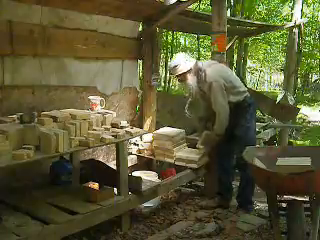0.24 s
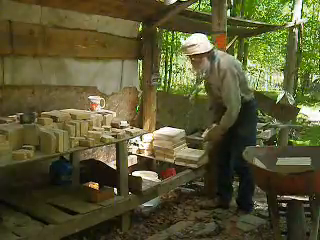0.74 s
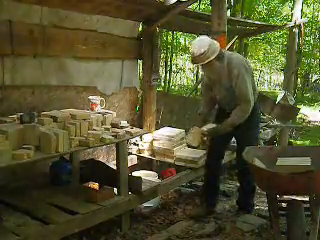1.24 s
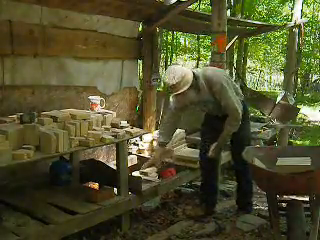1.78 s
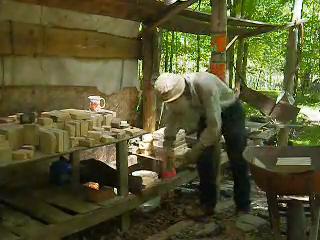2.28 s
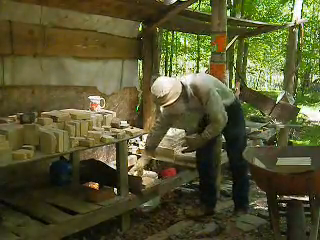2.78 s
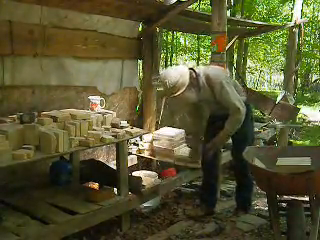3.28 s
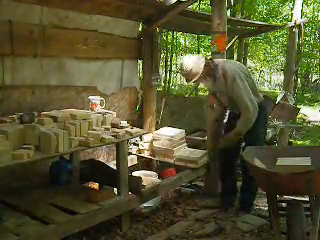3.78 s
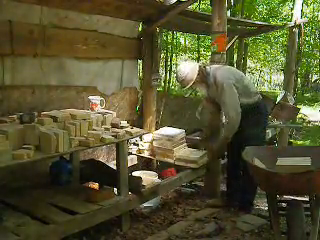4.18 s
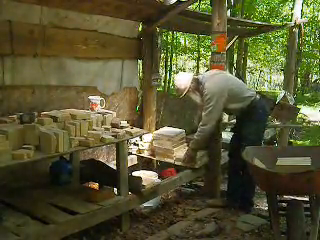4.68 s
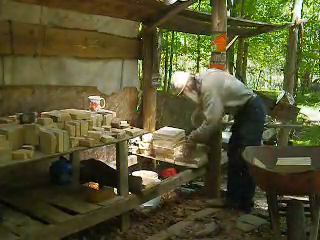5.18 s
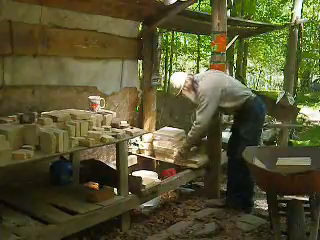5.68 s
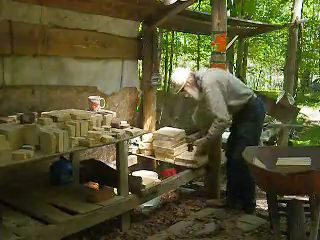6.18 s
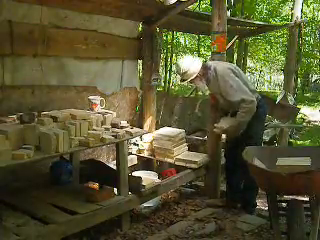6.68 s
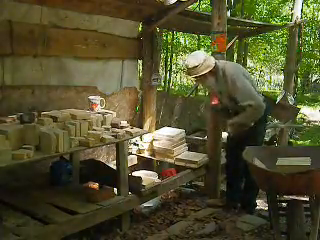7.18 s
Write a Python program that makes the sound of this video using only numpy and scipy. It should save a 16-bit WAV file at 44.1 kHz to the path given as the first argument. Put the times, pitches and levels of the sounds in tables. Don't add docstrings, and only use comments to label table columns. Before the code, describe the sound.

A bright ceramic clink opens, followed by thin high ticks and scratchy rubbing. Around two and three seconds, bricks thud against a wooden shelf with dull, woody knocks. After gloved swishing and a small bump, a brick is put down firmly and scuffed, ending in faint ringing taps. The open shed adds quick plank echoes and a short tail; leaves and wind stay low under crunchy, coarse digital grain.

```python
import sys
import numpy as np
from scipy import signal
from scipy.fft import rfft, irfft, next_fast_len
from scipy.io import wavfile
from scipy.ndimage import map_coordinates

SR = 44100
rng = np.random.default_rng(int(sys.argv[2]) if len(sys.argv) > 2 else 0)


def store_wav(level_fs):
    pcm = np.round(np.clip(np.atleast_2d(level_fs), -1, 1) * 32767)
    wavfile.write(sys.argv[1], SR, pcm.T.astype(np.int16))


def volts(x):
    e = np.asarray(x, float) / 20
    return 10 ** e


N = 328104

# centre in Hz, width in Hz, level in dB.
SHARD_MODES = [(1080, 28, -12.5), (1262, 60, -10.5), (1535, 68, -9.5), (1920, 95, -5), (2110, 37, -8),
               (2709, 58, 2), (3020, 56, 4), (3574, 75, -11), (3960, 130, -22)]
SHARD_LOW_MODES = [(2720, 63, -1), (2900, 120, -13.5)]
SHARD_HIGH_MODES = [(3043, 55, -3.5), (3118, 55, 0), (3500, 200, -17)]
BRICK_MODES = [(905, 58, -9.5), (1108, 51, -13), (1405, 35, 1), (1754, 29, 2), (2200, 53, -7.5),
               (3500, 45, -12.5)]
HELD_BRICK_MODES = [(1409, 68, -4.5), (1835, 39, -3), (2188, 48, -4), (3500, 34, 5.5)]
FREE_BRICK_MODES = [(3500, 44, 0)]
CHUNK_MODES = [(557, 140, 4.5), (685, 120, 1), (993, 65, 2), (1136, 85, -6.5), (1420, 61, -0.5),
               (1606, 13, -1), (1787, 39, -7.5), (2120, 23, -5.5), (2490, 150, -23.5), (2630, 41, -2),
               (3500, 43, -22)]
SHELF_MODES = [(129, 69, -10.5), (208.4, 36, 0), (322, 33, -3), (414, 35, -8.5), (534, 25, -4.5),
               (716, 29, -7.5), (982, 80, -18.5), (1247, 27, -10), (1820, 120, -22)]
STACK_MODES = [(236.4, 82, -10), (415, 65, -5), (504, 60, -0.5), (700, 72, -9), (897, 70, -13)]

# time in seconds, peak in dB, chatter t60 in seconds, brightness in dB per octave.
SHARD_HITS = [
    (.0708, -2.8, .0074, 2.5),
    (.0768, -8, .015, 0.5),
    (.0825, -11.5, .03, 1.5),
    (.0945, -19.5, 0.07, -4.5),
    (.108, -27, 0.039, -1.5),
]
BRICK_HITS = [
    (.029, -24.5, .05, 2.5),
    (.041, -28, 0.046, 1.5),
    (.056, -29, .073, -3),
    (5.05, -34, 0.057, 4.5),
    (5.09, -39, 0.12, 2),
    (5.671, -31, .06, -4),
    (5.732, -17.5, .04, -1),
    (5.742, -18, 0.061, -3),
    (5.78, -40, .12, 1.5),
]
SHELF_HITS = [
    (2.257, -16.5, 0.097, 2.5),
    (2.268, -16, .026, 2.5),
    (2.283, -20, 0.051, 4.5),
    (2.33, -24, 0.085, -6),
    (3.128, -14, .041, 1.5),
    (3.141, -15, .03, 1.5),
    (3.152, -22, .03, 1.5),
    (3.22, -36.5, 0.4, -6.5),
]
STACK_HITS = [
    (1.496, -27, 0.11, -5.5),
    (3.119, -26, 0.06, 3.5),
    (3.186, -32, .09, 0),
    (3.944, -22, 0.019, -1.5),
    (5.053, -35, .22, -3.5),
    (5.672, -28, 0.071, -7),
    (5.732, -17.5, .037, -1.5),
    (5.743, -20, .045, -2.5),
    (5.762, -31, .09, -7),
]
# time in seconds, peak in dB, chatter t60 in seconds,
# brightness in dB per octave, contact hardness in Hz.
CHUNK_HITS = [(.756, -36.5, .074, 5, 2007), (1.106, -34.5, .08, 4, 2200), (2.318, -12.5, .058, 2.5, 2670),
              (2.33, -17.5, .06, -2, 3500), (2.364, -36.5, .06, 0.5, 1620), (3.128, -29, .15, 4, 3000),
              (3.945, -31.5, .073, 8, 6000), (5.671, -32.5, .024, 9.5, 5994), (5.955, -34, .06, 4, 1500),
              (5.967, -29, .012, 2, 6000), (5.976, -32, .03, 2, 6000), (3.192, -34, .07, 1.5, 2000)]

# time in seconds, peak in dB, and chatter t60 in seconds if crisper than usual.
HIGH_TAPS = [(.0433, -27), (.1198, -31.5), (.1348, -35), (.4098, -39.5), (.4466, -44.5), (.7527, -31.5),
             (.7866, -31), (.8, -30.5), (.8192, -33.5), (.838, -31), (.8468, -25), (.8855, -39),
             (.9651, -41), (1.0166, -38.5), (1.0938, -39), (1.1545, -33), (1.1773, -35), (1.2094, -48)]
LOW_TAPS = [(.7978, -36), (.8184, -33.5), (.838, -27), (.8611, -35), (.971, -42), (1.0333, -35),
            (1.0603, -33.5), (1.0902, -37), (1.2057, -28.5), (1.2468, -32), (1.2725, -44)]
HELD_BRICK_TAPS = [(5.995, -46), (7.245, -41.5), (7.271, -31, .025), (7.29, -42), (7.32, -40), (7.403, -38),
                   (7.43, -37.5)]
FREE_BRICK_TAPS = [(5.05, -42), (5.085, -42.5), (5.146, -42), (5.708, -42), (5.733, -29, .035),
                   (5.977, -36), (6.006, -37.5), (7.261, -37), (7.292, -39), (7.304, -42), (7.39, -41.5),
                   (7.41, -37.5), (7.425, -37)]

# chatter t60 in seconds, brightness in dB per octave,
# contact hardness in Hz, rise in seconds.
TOUCH = dict(shard=(.03, 0, 6100, .0012), high=(0.13, -0.5, 6000, .004), low=(0.07, 0, 6000, .0035),
         brick=(.06, 0, 4503, .003), sing=(-0.24, 0.5, 2500, .0025), top=(0.1, 0, 6000, .0022),
         shelf=(.05, 0, 848, .0038), stack=(.06, 0, 1048, .0035), chunk=(.06, 0, 3000, .0014))

# start, firmest and end in seconds, high mode in dB,
# low mode over it in dB.
SHARD_RUB = [(0, .04, 0.044, -43, 1), (.13, .155, 0.24, -49, -12), (.18, .235, .31, -51, -8),
             (.36, .418, 0.51, -44, -3.5), (.725, .785, 0.88, -38, -7), (.79, .85, 0.92, -41, 1),
             (.93, .965, 1.04, -51.5, 1), (.97, 1.082, 1.11, -44, 2.5), (1.11, 1.185, 1.34, -47, -3)]
# start, firmest and end in seconds (in any order),
# level in dB.
BRICK_RUB = [(5.77, 5.825, 5.4, -52.5), (5.85, 5.944, 6, -56), (6.09, 6.135, 6.22, -52),
             (6.6, 6.646, 6.57, -48.5), (7.225, 7.272, 7.36, -46), (7.36, 7.44, 7.47, -43.5)]
SCUFF = [(.362, .398, 0.4, -49), (.43, .456, .505, -51), (.735, .756, .91, -43), (.95, .964, 1.0, -43.5),
         (1.03, 1.112, 1.15, -39), (1.1, 1.18, 1.3, -45), (5.925, 5.974, 6.05, -43), (6.19, 6.2, 6.26, -51),
         (6.262, 6.272, 6.4, -49.5), (6.35, 6.62, 6.78, -56.5), (6.765, 6.81, 6.84, -48.5),
         (6.83, 7.0, 7.012, -56), (7.04, 7.166, 7.205, -50)]
SWISH = [(1.468, 1.515, 1.565, -39.5), (2.585, 2.594, 2.625, -50), (2.62, 2.75, 2.78, -45.5),
         (3.58, 3.774, 3.86, -52.5), (3.84, 3.928, 3.935, -56), (3.95, 4.026, 4.04, -44.5),
         (4.025, 4.061, 4.13, -38), (4.07, 4.118, 4.142, -41.5)]

# frequency in Hz, level in dB per Hz.
GRIT = [(250, -22), (600, -1.5), (1000, -5.5), (1600, -0.5), (2200, -1.5), (3000, -5), (4000, -11.5)]
GLOVE = [(150, -15), (530, -2.5), (900, -5.5), (1320, -5), (1800, -5), (2320, -0.5), (2650, -4),
         (2980, 2.5), (3400, -4.5), (4000, -2.5), (4500, -5)]
LEAVES = [(40, -6), (150, 0.5), (400, -1), (1000, -5), (2000, -6.5), (3200, -5.5), (4500, -11.5)]

# time in seconds, level in dB, pitch in Hz.
THUMPS = [(1.545, -38, 120.5), (1.566, -39.5, 118.8), (1.584, -42.5, 119), (2.34, -40, 95),
          (2.508, -35, 61.7), (2.742, -46, 55.9), (2.93, -47, 39), (5.15, -43, 48.6), (5.33, -44.5, 65),
          (6.68, -49, 45), (6.95, -48, 55)]
# delay in seconds, level in dB.
WALLS = [(.0045, -15), (0.0116, -13.5), (0.015, -15), (0.026, -18.5), (0.032, -18.5)]
# time in seconds, wind level in dB.
GUSTS = [(0, -65.5), (.7, -63), (1.3, -64.5), (2.07, -67.5), (2.42, -58), (3.58, -63.5), (4.5, -67),
         (4.93, -59.5), (5.7, -61), (6.3, -65), (6.8, -57.5), (7.1, -63), (7.44, -63.5)]

USUAL_DB, QUICKEN = -20, .3
RISE_SHARE = .07
EDGE_DB, ROUND = 14, 1.3
LEAF_DB, CALM_DB, LEAF_SHARE = -48.5, -64, .12
STIR_DB, STIR_S = 5, 0.09
CLOCK_HZ, STEP = 8001.45, .00765
TOP_HZ = 15800


def unit(x):
    return x / np.sqrt(np.mean(x ** 2) + 1e-20)


def filtered(x, response):
    m = next_fast_len(len(x) + 2048)
    spectrum = rfft(x, m) * response(np.fft.rfftfreq(m, 1 / SR))
    return irfft(spectrum, m)[:len(x)]


def colour(points):
    hz_points, db = np.transpose(points)
    return lambda hz: volts(np.interp(np.log(hz + 1), np.log(hz_points), db, -80, -80))


def wobble(rate):
    knots = rng.standard_normal(int(N * rate / SR) + 4)
    return map_coordinates(knots, [np.arange(N) * rate / SR])


def body(modes, dull_db, slope_db=0, cut_hz=6000):
    def response(f):
        ring = 0
        for k, (centre, width, db) in enumerate(modes):
            mode = 1j * f * width / (centre * centre - f * f + 1j * f * width)
            ring = ring + (-1) ** k * volts(db) * mode
        broad = volts(dull_db) * 1j * f * 2500 / (1500 ** 2 - f * f + 1j * f * 2500)
        order = slope_db / (20 * np.log10(2))
        tilt = ((f + 60) / 1000) ** order * 1j ** order / (1 + (f / 5000) ** 8)
        softness = 1 - (f / cut_hz) ** 2 + 1.4j * f / cut_hz
        return (ring + broad) * tilt / softness
    return response


def grains(count, spike_db):
    size = volts(spike_db * rng.exponential(size=count // 8 + 1)).repeat(8)[:count]
    return unit(size * rng.standard_normal(count))


def hits(table, modes, touch, dull_db, blow, gain_db):
    out = np.zeros(N + SR)
    t = np.arange(SR // 7) / SR
    for start, db, *own in table:
        t60, slope_db, cut_hz, rise = (*own, *TOUCH[touch][len(own):])
        t60 = abs(t60)
        quick_rise = abs(rise) * volts(QUICKEN * (USUAL_DB - db))
        rise = min(quick_rise, RISE_SHARE * t60)
        force = grains(len(t), spike_db=3) * volts(-60 * t / t60) * (1 - np.exp(-t / rise))
        force[round(rise * SR)] += blow
        sound = filtered(force, body(modes, dull_db, slope_db, cut_hz))
        out[round(start * SR):][:len(t)] += volts(db + gain_db) * sound / np.abs(sound).max()
    return out[:N]


def strokes(table, lower):
    t = np.arange(0, N / SR, .001)
    gain = 0
    for row in table:
        away = np.interp(t, np.sort(row[:3]), [1, 0, 1], 9, 9)
        db = row[3] + (row[4] if lower else 0)
        gain = gain + volts(db - EDGE_DB * away ** ROUND)
    return np.interp(np.arange(N) / SR, t, gain)


def rub(table, response, clump_db, gain_db, lower=False):
    force = grains(N, spike_db=0.5) * volts(clump_db * wobble(45))
    return volts(gain_db) * strokes(table, lower) * unit(filtered(force, response))


def shard():
    clink = hits(SHARD_HITS, SHARD_MODES, 'shard', -19.0, blow=20, gain_db=2.5)
    high_taps = hits(HIGH_TAPS, SHARD_HIGH_MODES, 'high', -36, blow=2.5, gain_db=-2.0)
    low_taps = hits(LOW_TAPS, SHARD_LOW_MODES, 'low', -34, blow=2.5, gain_db=0.5)
    high_rub = rub(SHARD_RUB, body(SHARD_HIGH_MODES, -32.0), clump_db=-1.0, gain_db=1.0)
    low_rub = rub(SHARD_RUB, body(SHARD_LOW_MODES, -30.5), clump_db=2.0, gain_db=1.0, lower=True)
    return clink + high_taps + low_taps + high_rub + low_rub


def bricks():
    knocks = hits(BRICK_HITS, BRICK_MODES, 'brick', -29.0, blow=11, gain_db=1.0)
    chunks = hits(CHUNK_HITS, CHUNK_MODES, 'chunk', -10.5, blow=5.15, gain_db=2.5)
    held_taps = hits(HELD_BRICK_TAPS, HELD_BRICK_MODES, 'sing', -28.5, blow=3.4, gain_db=1.5)
    free_taps = hits(FREE_BRICK_TAPS, FREE_BRICK_MODES, 'top', -33.5, blow=5.1, gain_db=-0.5)
    slides = rub(BRICK_RUB, body(HELD_BRICK_MODES, -24.5, -3.0), clump_db=3.0, gain_db=-0.2)
    scuffs = rub(SCUFF, colour(GRIT), clump_db=-0.5, gain_db=-1.0)
    return knocks + chunks + held_taps + free_taps + slides + scuffs


def planks():
    shelf = hits(SHELF_HITS, SHELF_MODES, 'shelf', -37.5, blow=29, gain_db=1.0)
    return shelf + hits(STACK_HITS, STACK_MODES, 'stack', -24.5, blow=8, gain_db=0.8)


def glove():
    return rub(SWISH, colour(GLOVE), clump_db=2.0, gain_db=2.5)


def shed(x):
    t = np.arange(SR // 4) / SR
    tail = rng.standard_normal(len(t)) * volts(-60 * t / 0.22)
    answer = volts(-19) * tail / np.sqrt(SR * 0.017)
    answer[0] = 1
    for delay, db in WALLS:
        answer[round(delay * SR)] += volts(db)
    return signal.fftconvolve(x, answer / np.linalg.norm(answer))[:N]


def footfalls():
    out = np.zeros(N + SR)
    t = np.arange(SR // 8) / SR
    swell = t / .012 * np.exp(-t / .012)
    for start, db, hz in THUMPS:
        out[round(start * SR):][:len(t)] += volts(db + 7.5) * np.sin(2 * np.pi * hz * t) * swell
    return out[:N]


def woods():
    t = np.arange(N) / SR
    wind_db = np.interp(t, *np.transpose(GUSTS))
    leaf_db = LEAF_DB + LEAF_SHARE * (wind_db - CALM_DB) + STIR_DB * np.exp(-t / STIR_S)
    leaves = unit(filtered(rng.standard_normal(N), colour(LEAVES)))
    rumble = colour([(15, -8.0), (40, -0.5), (90, -0.5), (160, -16.5)])
    wind = unit(filtered(rng.standard_normal(N), rumble))
    leaves *= volts(leaf_db + 0.99 * wobble(7) + 0.5 * wobble(25))
    return leaves + wind * volts(wind_db + 2.5 * wobble(6))


def scene():
    handling = shard() + bricks() + planks() + glove()
    return (shed(handling) + footfalls() + woods())[None]


def low_pass(x):
    return signal.sosfilt(signal.butter(12, 16510, fs=SR, output="sos"), x)


def record(dry):
    tick = np.floor(np.arange(N) * CLOCK_HZ / SR)
    sampled = map_coordinates(dry[0], [tick * SR / CLOCK_HZ], order=1)
    steps = np.clip(np.floor(sampled / STEP + .04), -112, 112)
    held = filtered(STEP * steps, lambda hz: hz < TOP_HZ)
    return low_pass(held[None])


dry = scene()
out = record(dry)
store_wav(out)
```